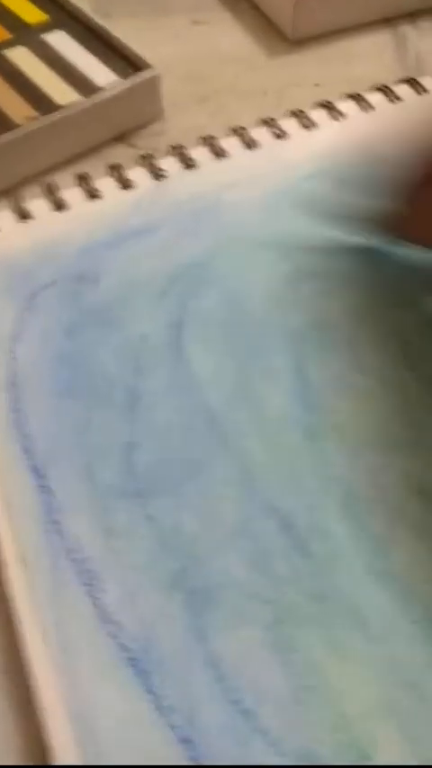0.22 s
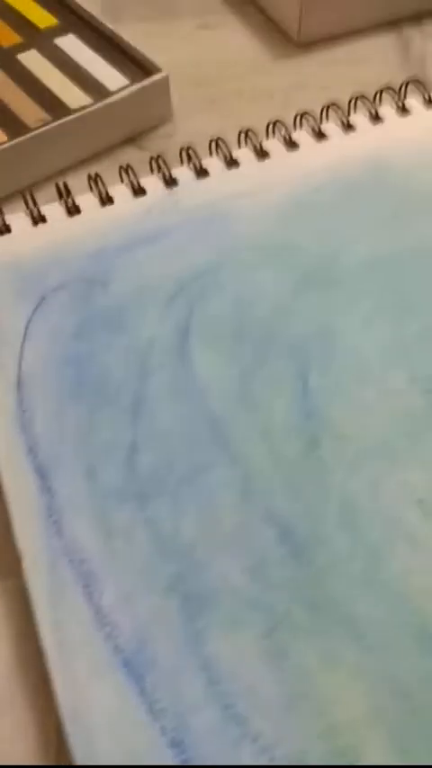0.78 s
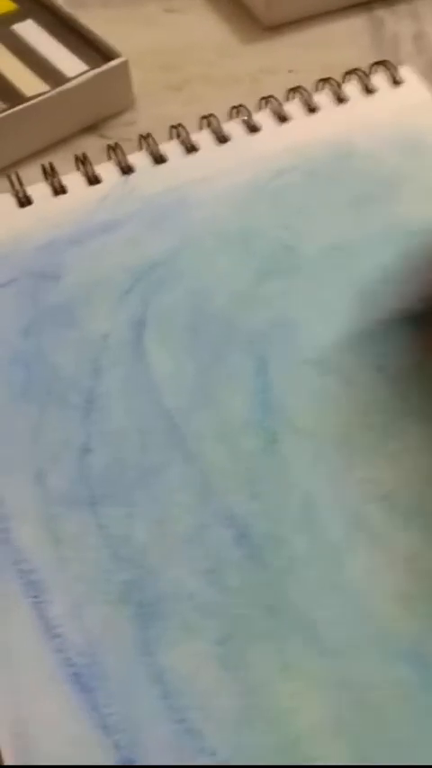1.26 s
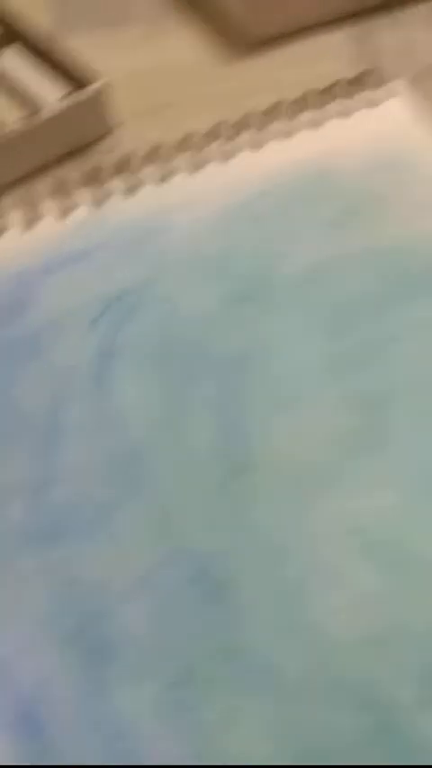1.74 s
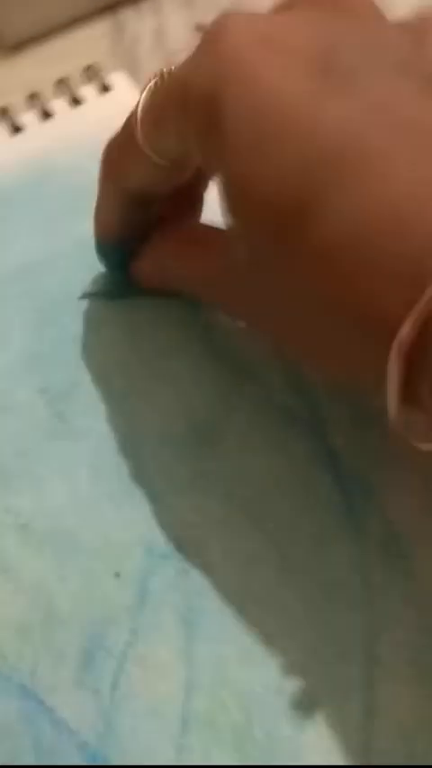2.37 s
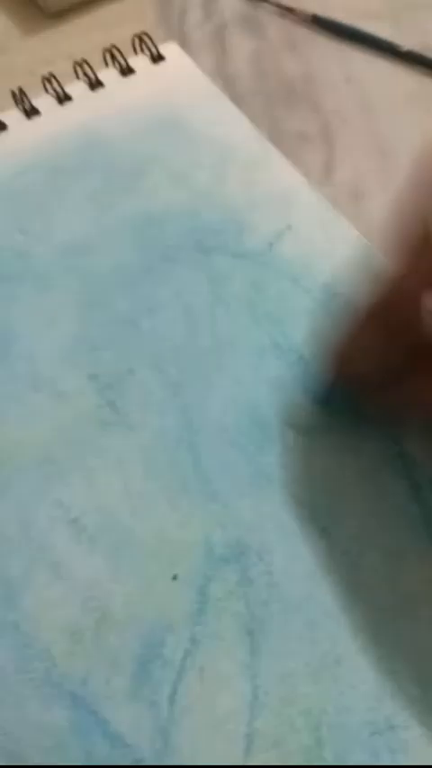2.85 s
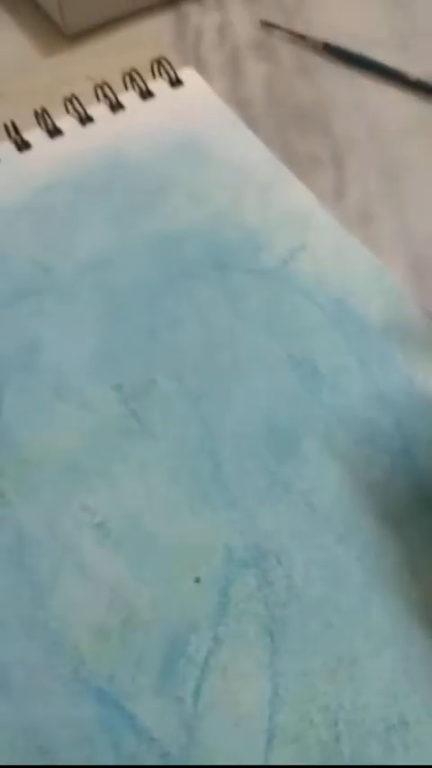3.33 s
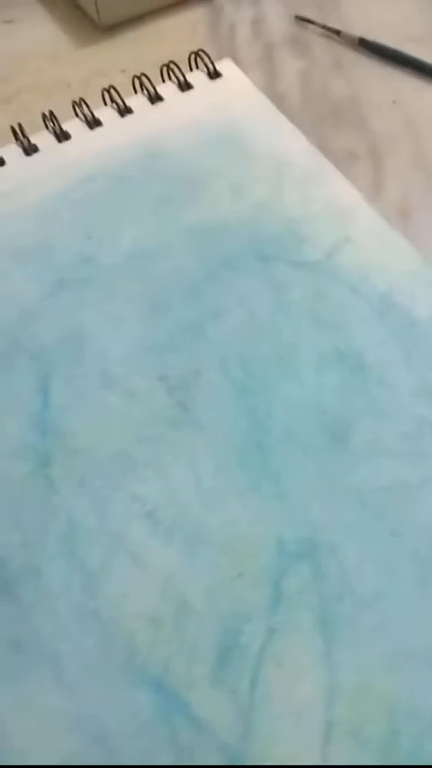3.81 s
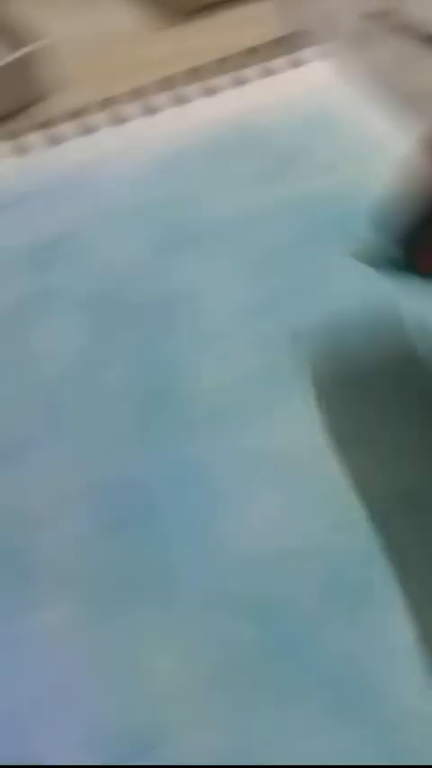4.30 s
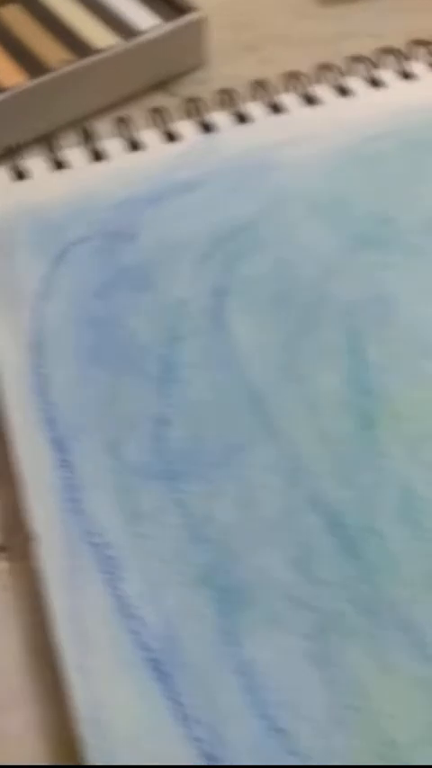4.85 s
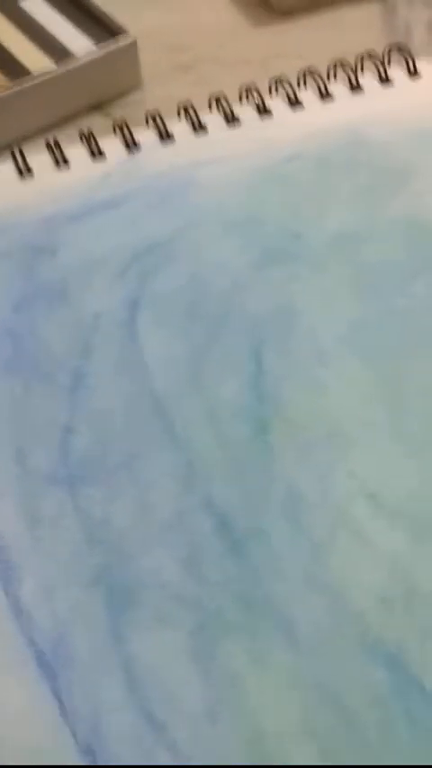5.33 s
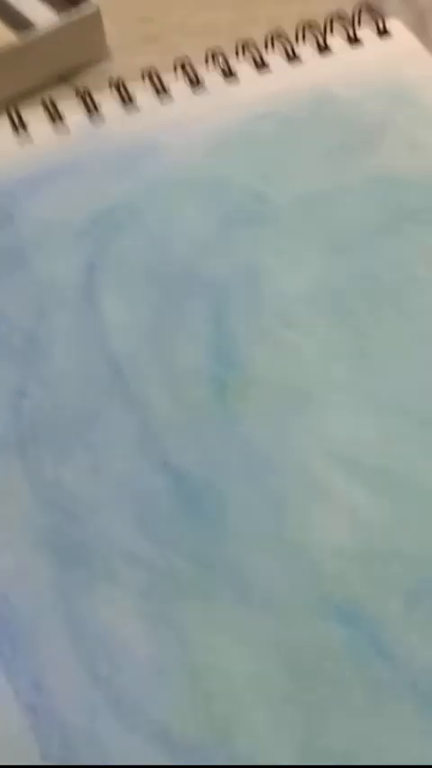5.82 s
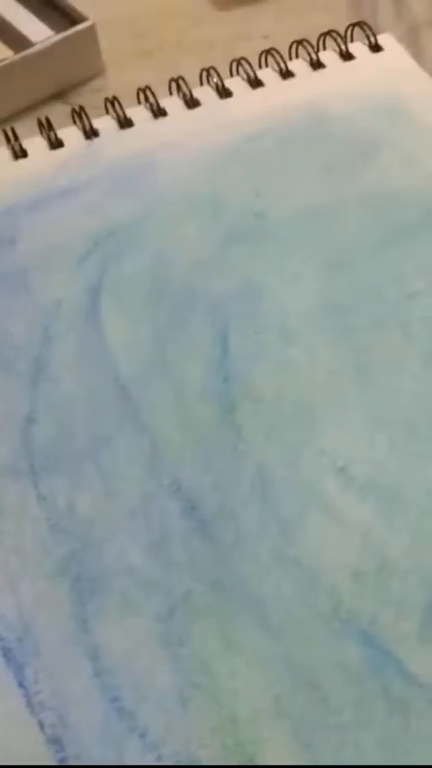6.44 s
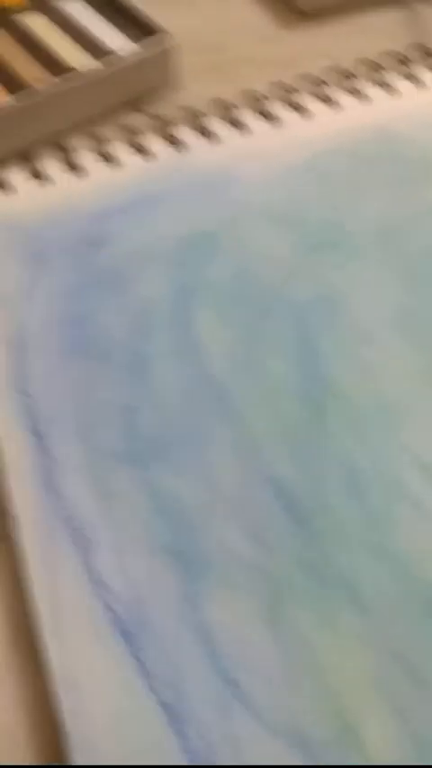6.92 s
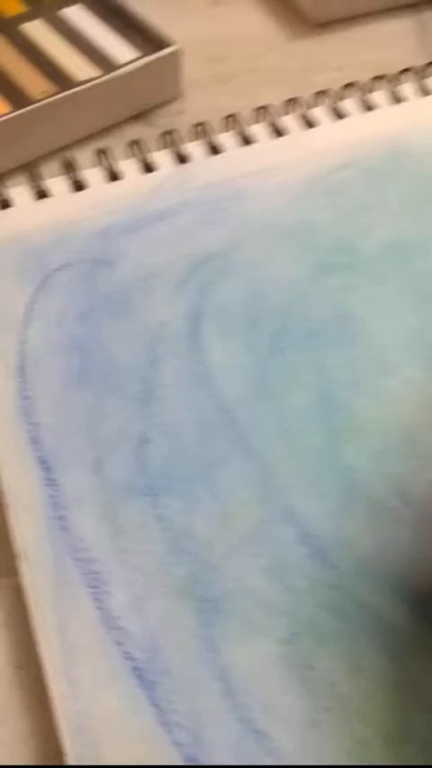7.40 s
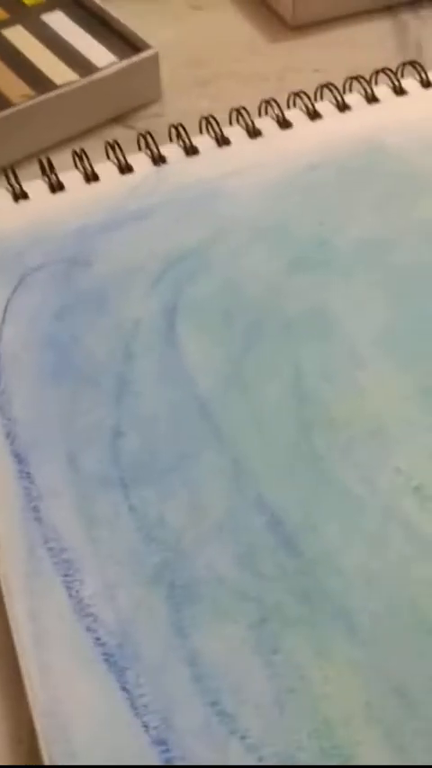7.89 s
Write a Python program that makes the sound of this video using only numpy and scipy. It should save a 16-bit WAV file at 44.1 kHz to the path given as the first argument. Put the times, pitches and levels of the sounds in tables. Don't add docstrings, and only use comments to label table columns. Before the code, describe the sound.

Quick bursts of scratchy pastel rubbing on sketch paper, each starting abruptly and stopping quickly, sliding slightly from side to side. Between them only quiet hiss and low room rumble remain, with small muffled knocks on the pad. In the second half a distant vehicle drone swells and recedes. Dry, close phone pickup indoors with barely any echo.

```python
import sys
import numpy as np
from scipy import signal
from scipy.fft import rfft, irfft, next_fast_len
from scipy.io import wavfile
from scipy.ndimage import uniform_filter1d, map_coordinates

SR = 44100
rng = np.random.default_rng(int(sys.argv[2]) if len(sys.argv) > 2 else 0)


def rack_gain(trim_db):
    fader = np.asarray(trim_db, float)
    return 10 ** (fader / 20)


def to_wav(s):
    ch = np.atleast_2d(s).T
    pcm = np.round(np.clip(ch, -1, 1) * 32767)
    wavfile.write(sys.argv[1], SR, pcm.astype(np.int16))


N = 359415


def rms_one(x):
    return x / np.sqrt(np.mean(x ** 2) + 1e-20)


def in_time(rows):
    s, *columns = np.transpose(rows)
    return [np.interp(np.arange(N) / SR, s, column) for column in columns]


def at_hz(points, hz):
    table_hz, values = np.array(points)[:, 0], np.array(points)[:, 1]
    return np.interp(np.log(hz), np.log(table_hz), values)


def drift(rate):
    r = np.exp(-80 * np.pi * rate / SR)
    noise = rng.standard_normal(N // 40 + 2002)
    slow = signal.lfilter([1], [1, -2 * r, r * r], noise)[2000:]
    return np.interp(np.arange(N) / 40, np.arange(len(slow)), rms_one(slow))


def swells(s, spread_s):
    t = np.arange(0, N + 64, 64) / SR
    return t, -6 * ((t - s[:, None]) / spread_s[:, None]) ** 2


def summed_db(rows_db):
    return 10 * np.log10(np.sum(rack_gain(2 * rows_db), axis=0) + 1e-12)


def stereo_spectrum(pair, spectrum, likeness):
    size = next_fast_len(N + N % 2, real=True)
    hz = np.maximum(np.arange(size // 2 + 1) * SR / size, 1)
    alike = np.clip(at_hz(likeness, hz), -1, 1)
    mid, side = rfft(pair, size) * rack_gain(at_hz(spectrum, hz))
    return hz, np.sqrt(1 + alike) * mid + np.sqrt(1 - alike) * side * [[1], [-1]]


def hand():
    # (top speed [s],
    # scratch [dB], time to lose 6 dB [s], broad-contact rasp re scratch [dB], pad re scratch [dB])
    first_pass = [(-0.002, -32.6, 0.034, -14.0, -24.8), (0.088, -28.9, 0.035, -22.9, -29.7),
                  (0.394, -41.8, 0.038, -8.4, -25.2), (0.424, -29.3, 0.031, -14.5, -28.1),
                  (0.491, -30.6, 0.039, -11.8, -32.5), (0.595, -25.7, 0.038, -19.9, -33.5),
                  (0.698, -30.2, 0.039, -11.8, -33.5), (0.786, -27.0, 0.038, -15.9, -33.0),
                  (0.846, -34.7, 0.038, -14.8, -24.9), (1.167, -29.4, 0.037, -19.0, -35.8),
                  (1.212, -30.5, 0.052, -15.9, -29.7), (1.316, -28.9, 0.034, -14.1, -32.7),
                  (1.407, -26.7, 0.032, -13.6, -30.5), (1.448, -28.9, 0.039, -18.9, -33.8),
                  (1.535, -29.7, 0.042, -13.3, -28.3), (1.624, -28.6, 0.043, -9.3, -27.6),
                  (2.015, -57.1, 0.008, -12.0, -18.0), (2.165, -60.4, 0.008, -12.0, -18.0)]
    second_pass = [(2.43, -53.8, 0.039, -7.2, -22.1), (2.498, -50.4, 0.008, -12.0, -18.0),
                   (2.551, -36.8, 0.032, -14.0, -27.9), (2.598, -34.4, 0.039, -10.9, -33.7),
                   (2.674, -28.7, 0.036, -9.7, -31.7), (2.749, -31.1, 0.042, -15.8, -32.9),
                   (2.833, -28.2, 0.041, -11.1, -28.4), (2.916, -33.3, 0.042, -16.2, -33.3),
                   (2.984, -29.2, 0.039, -14.0, -27.7), (3.057, -33.9, 0.052, -8.2, -30.6),
                   (3.157, -30.5, 0.04, -13.5, -26.3), (3.245, -46.6, 0.008, -12.0, -18.0),
                   (3.575, -28.8, 0.039, -12.4, -28.6), (3.667, -29.4, 0.041, -12.1, -39.5),
                   (3.729, -28.5, 0.049, -9.8, -31.2), (3.77, -29.6, 0.039, -12.3, -28.6),
                   (3.852, -28.9, 0.04, -11.8, -31.3), (3.93, -28.9, 0.034, -7.3, -27.7)]
    third_pass = [(4.495, -43.2, 0.046, -7.0, -22.0), (4.566, -32.2, 0.033, -14.4, -33.3),
                  (4.613, -28.0, 0.05, -15.3, -31.6), (4.708, -33.0, 0.045, -18.2, -28.9),
                  (4.8, -29.8, 0.053, -15.4, -27.5), (4.893, -31.8, 0.056, -15.0, -26.5),
                  (4.959, -31.9, 0.05, -10.8, -25.3), (5.059, -47.5, 0.008, -12.0, -18.0),
                  (5.216, -61.5, 0.008, -12.0, -18.0), (5.327, -32.4, 0.041, -12.4, -26.7),
                  (5.376, -29.1, 0.049, -12.1, -28.4), (5.442, -27.4, 0.042, -11.4, -30.9),
                  (5.539, -29.8, 0.047, -15.9, -26.5), (5.627, -43.3, 0.038, -13.2, -17.9),
                  (5.897, -30.8, 0.039, -12.3, -32.8), (5.935, -27.6, 0.046, -14.8, -30.1),
                  (6.016, -29.6, 0.034, -13.2, -29.4), (6.113, -30.2, 0.037, -12.8, -26.0),
                  (6.202, -34.2, 0.04, -11.0, -21.8), (6.328, -58.1, 0.008, -12.0, -18.0)]
    third_pass_end = [(6.478, -52.5, 0.03, -7.5, -13.9), (6.519, -31.1, 0.017, -13.2, -28.9),
                      (6.553, -30.7, 0.03, -13.4, -29.6), (6.6, -28.5, 0.05, -15.4, -28.9),
                      (6.657, -36.3, 0.048, -11.5, -23.3), (6.742, -34.7, 0.036, -11.2, -22.7),
                      (6.96, -62.9, 0.008, -12.0, -18.0), (7.191, -44.8, 0.038, -11.9, -18.3),
                      (7.273, -31.8, 0.03, -13.2, -28.0), (7.329, -29.6, 0.053, -17.5, -32.9),
                      (7.398, -34.1, 0.054, -12.3, -26.1), (7.517, -30.1, 0.074, -17.5, -28.0),
                      (7.635, -33.9, 0.058, -14.0, -27.0), (7.73, -28.8, 0.054, -10.6, -26.5),
                      (7.825, -34.3, 0.056, -8.4, -24.2), (8.012, -59.0, 0.008, -12.0, -18.0),
                      (8.052, -61.7, 0.008, -12.0, -18.0), (8.148, -35.7, 0.038, -12.5, -25.4)]
    # (stick touches [s], stick lifts [s], hovering hand afterwards [dB],
    # left-right at start [dB], left-right at end [dB])
    bursts = [(-0.1, 0.13, -67, 0.1, -0.5), (0.347, 0.87, -60, -1.2, 0.8), (1.119, 1.66, -58, -1.8, 4),
              (2.402, 3.19, -63.5, -4.5, 7), (3.531, 3.96, -59, 1.2, 6.3), (4.46, 5.0, -63.5, -2.5, 4.5),
              (5.272, 5.64, -64, 5.5, 2.5), (5.853, 6.24, -66.5, 5, 1.2), (6.448, 6.77, -70, 5.5, 2.2),
              (7.165, 7.87, -62.5, -1.2, 6), (8.11, 8.2, -62, 7.0, 6.8)]
    landing_s, landing_db_per_s, lift_db_per_s = .017, 1800, 335
    hover_sag_db_per_s, hover_rasp_db, hover_pad_db = 13, -15, -14.5
    hover_pan_db, withdraw_s = .3, .12

    s, top_db, spread_s, *colours_db = np.transpose(first_pass + second_pass + third_pass + third_pass_end)
    touch, lift, hover_db, pan_from, pan_to = np.transpose(bursts)
    t, bells_db = swells(s, spread_s)

    landed = touch[np.searchsorted(touch, s) - 1] + landing_s
    landing_db = np.minimum(landing_db_per_s * (t - landed[:, None]), 0)
    strokes_db = top_db[:, None] + bells_db + landing_db
    lifting_db = lift_db_per_s * t
    contact_db = np.maximum.accumulate(summed_db(strokes_db) + lifting_db) - lifting_db

    last = np.maximum(np.searchsorted(lift, t) - 1, 0)
    hovering_db = hover_db[last] - hover_sag_db_per_s * (t - lift[last])
    scratch_db = summed_db(np.array([contact_db, hovering_db]))

    shares = rack_gain(2 * (strokes_db - strokes_db.max(axis=0)))
    down = rack_gain(contact_db - scratch_db)
    stroke_colours_db = colours_db @ shares / shares.sum(axis=0)
    rasp_db, pad_db = down * stroke_colours_db + (1 - down) * [[hover_rasp_db], [hover_pad_db]]

    moments = np.ravel([touch - .04, touch, lift, lift + withdraw_s], order="F")
    middle = hover_pan_db + 0 * touch
    pan_db = np.interp(t, moments, np.ravel([middle, pan_from, pan_to, middle], order="F"))
    return in_time(np.transpose([t, scratch_db, rasp_db, pad_db, pan_db]))


def grains(per_s, spread_db):
    sizes_db = spread_db * np.minimum(rng.exponential(1, (2, N)), 5)
    signs = rng.choice([-1, 1], (2, N))
    return rack_gain(sizes_db) * signs * (rng.random((2, N)) < per_s / SR)


def rubbing():
    # (frequency [Hz], level [dB per Hz])
    scratch_colour = [(350, -61), (600, -36), (716, -36), (1090, -29), (1450, -30), (2400, -23),
                      (3030, -15.5), (4260, -11.5), (5820, -7), (7330, -3.5), (9630, 0.1), (12000, -4.5),
                      (15500, -11)]
    # (frequency [Hz], likeness [-1..1])
    port_likeness = [(600, .5), (1400, .6), (2600, .5), (3600, .45), (5500, .01), (7500, .93), (10000, .9),
                     (15000, .7)]
    # (frequency [Hz], left-right [dB])
    left_bias = [(600, -8), (1300, -1.5), (2400, -4.5), (4400, 1.5), (8000, 2.5), (15000, -5)]
    port_lag_s, lag_s_per_db = .00019, -.000018

    scratch_db, rasp_db, pad_db, pan_db = hand()
    hz, ports = stereo_spectrum(grains(per_s=16000, spread_db=1.6), scratch_colour, port_likeness)
    ports = ports * rack_gain(at_hz(left_bias, hz) * [[.5], [-.5]])

    above_pad = 1 / (1 + (2600 / hz) ** 8)
    above_rasp = 1 / (1 + (6000 / hz) ** 8)
    shares = (above_rasp, above_pad - above_rasp, 1 - above_pad)
    lag = SR * (port_lag_s + lag_s_per_db * uniform_filter1d(pan_db, size=4000))
    late = np.clip(np.arange(N) - lag, 0, N - 1)
    tooth_db = .4 * drift(45) + .9 * drift(200)

    scratch, rasp, pad = (irfft(ports * share)[:, :N] for share in shares)
    out = scratch / np.std(scratch.mean(axis=0))
    for layer, rel_db in ((rasp, rasp_db), (pad, pad_db)):
        late_left = map_coordinates(layer[0], [late], order=1)
        pair = np.array([late_left, layer[1]])
        flicker_db = .8 * drift(18)
        out = out + pair / np.std(pair.mean(axis=0)) * rack_gain(rel_db + flicker_db)
    return out * rack_gain(scratch_db + tooth_db + pan_db * [[.5], [-.5]])


def knocks():
    # (time [s], peak [dB], left-right [dB])
    pad_bumps = [
        (0.909, -47, 2),
        (0.929, -49, 4),
        (1.38, -49, -1.5),
        (1.512, -42, 1.0),
        (1.853, -48, 16),
        (4.346, -53, 5),
        (5.859, -47.5, 3.5),
    ]
    # (frequency [Hz], level [dB], time to die by 60 dB [s])
    pad_tones = [
        (310, 7.5, 0.029),
        (480, 1, 0.029),
        (900, 1, 0.016),
        (1800, -4, 0.011),
    ]
    s, peak_db, pan_db = np.transpose(pad_bumps)
    out = np.zeros((2, N))
    for hz, level_db, t60 in pad_tones:
        clicks = np.zeros((2, N)) + 1e-18
        chance = rng.normal(0, 1, (len(s), 2)).T
        click_db = peak_db + level_db - 7.5 + pan_db * [[.5], [-.5]]
        clicks[:, (s * SR).astype(int)] = rack_gain(click_db) * np.sign(chance + .4)
        r, w = rack_gain(-60 / (t60 * SR)), 2 * np.pi * hz / SR
        out += signal.lfilter([.5, 0, -.5], [1, -2 * r * np.cos(w), r * r], clicks)
    return out


def room(x):
    t60_s = 0.24
    t = np.arange(SR // 2) / SR
    tail = rng.standard_normal((2, len(t))) * rack_gain(-60 * t / t60_s) * (t > .008)
    tail = tail / np.sqrt(np.sum(tail ** 2, axis=1, keepdims=True))
    return signal.fftconvolve(x, tail, axes=1)[:, :N]


def street():
    # (rumble [dB], lower drone [dB], upper drone [dB])
    constant_db = (-57, -71.5, -74)
    # (nearest [s], time to lose 6 dB [s], rumble [dB], lower drone [dB], upper drone [dB])
    vehicles = [(2.9, .2, -66, -66, -74), (3.75, .2, -64, -64, -71), (4.3, .15, -66, -57, -66),
                (4.8, .3, -56, -58.5, -63), (5.4, .2, -53, -63, -62), (5.78, .1, -62, -62, -53),
                (5.97, .12, -50.5, -60, -58), (6.3, .15, -50, -57, -44.5), (6.75, .3, -56, -65, -58),
                (7.4, .2, -55, -65, -57.5), (8.1, .2, -57, -70, -63)]
    s, spread_s, *tops_db = np.transpose(vehicles)
    t, bells_db = swells(s, spread_s)
    levels = []
    for top_db, base_db in zip(tops_db, constant_db):
        passing_db = top_db[:, None] + bells_db
        levels.append(summed_db(np.vstack([passing_db, base_db + 0 * t])))
    return in_time(np.transpose([t, *levels]))


def resonate(x, modes):
    out = 0
    for k, (hz, width, level_db) in enumerate(modes):
        r = np.exp(-np.pi * width / SR)
        ringing = signal.lfilter([1, 0, -1], [1, -2 * r * np.cos(2 * np.pi * hz / SR), r * r], x)
        out = out + (-1) ** k * rack_gain(level_db) * (1 - r * r) / 2 * ringing
    return out


def sharp(x, modes):
    out = 0
    for hz, width, level_db in modes:
        once = resonate(x, [(hz, width, level_db)])
        out = out + resonate(once, [(hz, width, 0)])
    return rms_one(out)


def traffic():
    # (frequency [Hz], width [Hz], level [dB])
    room_tones = [(102.5, 9, -11.5), (127.3, 12, -6), (169.2, 15, -0.2), (193, 15, 0), (212.4, 12.6, 0.5)]
    # (frequency [Hz], width [Hz], level [dB])
    lower_tones = [(252, 12, 0.1), (465, 30, -20)]
    upper_tones = [(280, 7, 0.1), (340, 30, -18), (382, 25, -22), (560, 14, -24)]
    rumble_db, low_db, drone_db = street()
    common, own = rng.standard_normal((3, N)), rng.standard_normal((3, 2, N))
    rumble = sharp(common[0] + 0.14 * own[0], room_tones) * rack_gain(rumble_db + [[-1.3], [-.3]])
    low = sharp(common[1] + .2 * own[1], lower_tones) * rack_gain(low_db + [[-.3], [-1.3]])
    drone = sharp(common[2] + .22 * own[2], upper_tones) * rack_gain(drone_db + [[.1], [-1.6]])
    return rumble + low + drone


def air():
    # (frequency [Hz], level [dB per Hz])
    hiss_colour = [(15, -67), (25, -37), (49, -30.5), (101, -15.5), (198, -6.5), (331, -12.5), (782, -26.5),
                   (1620, -32.5), (2300, -32), (4150, -38), (6550, -34), (7100, -35), (10100, -29),
                   (15500, -34)]
    # (frequency [Hz], likeness [-1..1])
    hiss_likeness = [(60, 0.82), (150, 0.94), (380, 0.52), (950, 0.05), (2380, 0.04), (5980, 0.61),
                     (15000, 0.89)]
    hz, ports = stereo_spectrum(rng.standard_normal((2, N)), hiss_colour, hiss_likeness)
    level_db = -60 + 1.0 * drift(2.2)
    return rack_gain(level_db) * rms_one(irfft(ports)[:, :N])


def scene():
    near = rack_gain(1.2) * rubbing() + knocks()
    return near + rack_gain(-27.5) * room(near) + traffic() + rack_gain(1.1) * air()


def patches(shape, bins, frames):
    over_pitch = uniform_filter1d(rng.standard_normal(shape), size=bins, axis=-2)
    return rms_one(uniform_filter1d(over_pitch, size=frames, axis=-1))


def starve(x, coarse_db, side_floor_db, side_chance_db):
    # (frequency [Hz], threshold [spreads of chance])
    hole_rarity = [(900, 3.0), (1500, 1.1), (2600, .7), (5000, .6), (7000, .9), (9500, 1.6), (12500, .8),
                   (15500, .6)]
    # (from [s], to [s], low [Hz], high [Hz])
    dropouts = [(.34, .44, 2100, 2400), (.72, .78, 1950, 3000), (1.15, 1.3, 1450, 1650),
                (1.6, 1.7, 14500, 16000), (2.51, 2.8, 2150, 3150), (2.8, 3.1, 2600, 3100),
                (2.56, 2.7, 6300, 7000), (3.51, 3.6, 2450, 3350), (3.6, 4.0, 2550, 2800),
                (4.5, 4.65, 2300, 3000), (7.25, 7.35, 2300, 2900)]
    frame, lead = 1024, 1024 - 493

    padded = np.pad([x[0] + x[1], x[0] - x[1]], [(0, 0), (lead, 0)])
    hz, s, cells = signal.stft(padded, SR, nperseg=2 * frame)
    hz, s = hz[:, None], s - lead / SR
    kept = patches(cells.shape, bins=12, frames=3) < at_hz(hole_rarity, hz + 1)
    for start, end, low_hz, high_hz in dropouts:
        kept[0] &= (s < start) | (s > end) | (hz < low_hz) | (hz > high_hz)

    power = uniform_filter1d(uniform_filter1d(np.abs(cells) ** 2, size=48, axis=1), size=2, axis=2)
    floor_db = side_floor_db + side_chance_db * patches(cells.shape[1:], bins=48, frames=3)
    kept[1] &= (power[1] > rack_gain(2 * floor_db) * power[0]) | (hz < 6900)

    mottle = rack_gain(coarse_db * patches(cells.shape[1:], bins=9, frames=2) * (hz > 600))
    thinned = signal.istft(cells * kept * mottle, SR, nperseg=2 * frame)[1]
    mid, side = thinned[:, lead:][:, :N]
    return np.array([mid + side, mid - side]) / 2


def band_limit(x):
    return signal.sosfilt(signal.butter(12, 16000, fs=SR, output="sos"), x)


def record(dry):
    thin = starve(dry, coarse_db=2.2, side_floor_db=-15.5, side_chance_db=3)
    return band_limit(thin)


dry = scene()
out = record(dry)
to_wav(out)
```